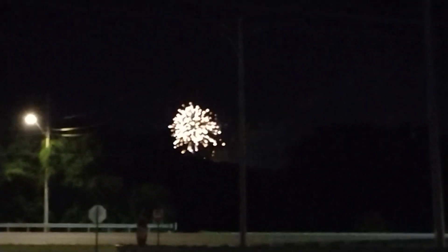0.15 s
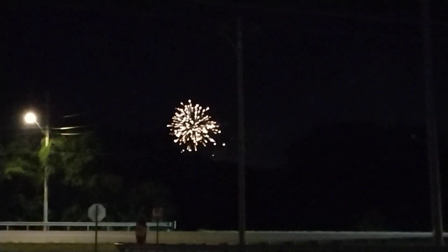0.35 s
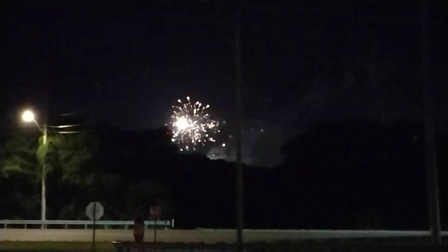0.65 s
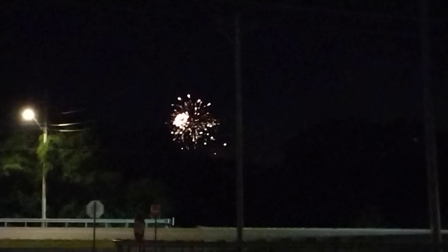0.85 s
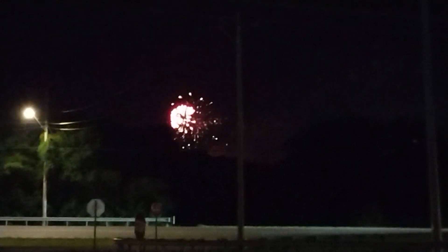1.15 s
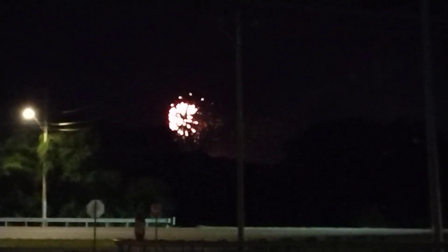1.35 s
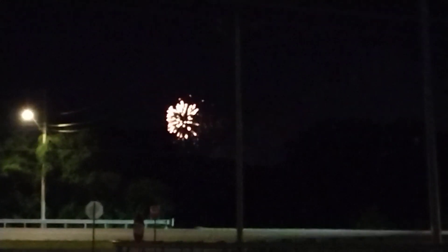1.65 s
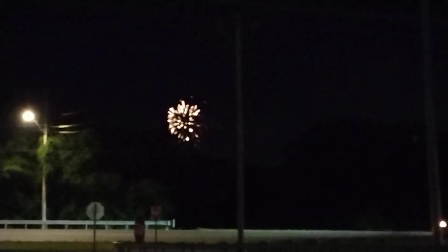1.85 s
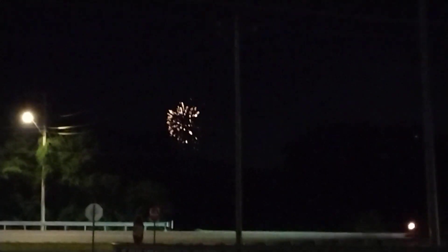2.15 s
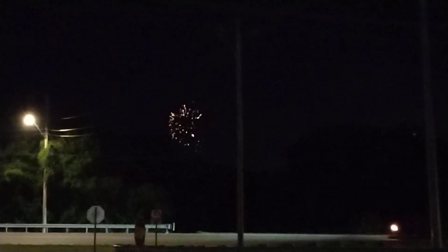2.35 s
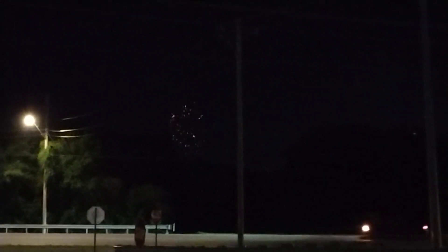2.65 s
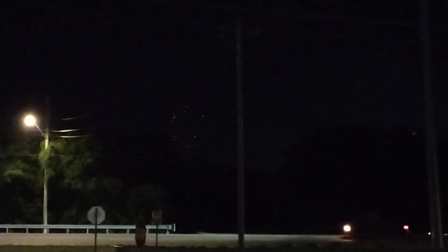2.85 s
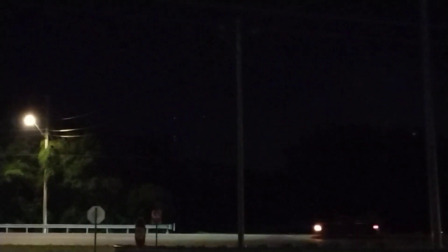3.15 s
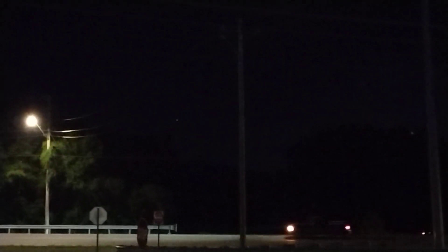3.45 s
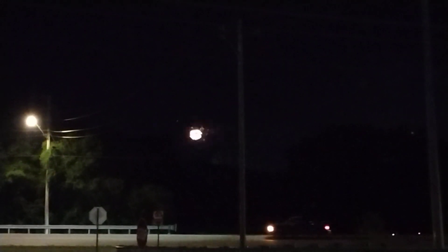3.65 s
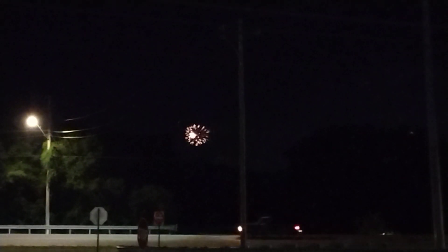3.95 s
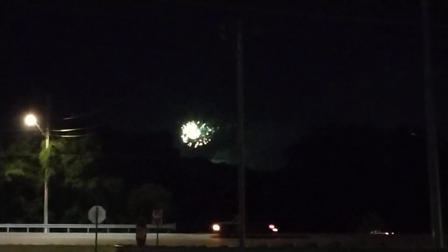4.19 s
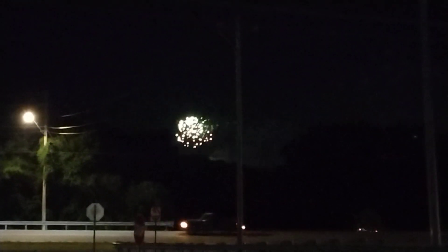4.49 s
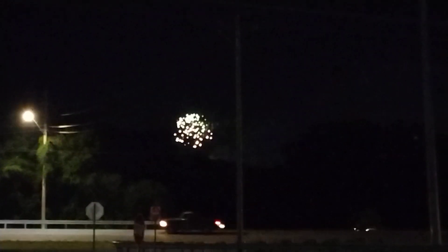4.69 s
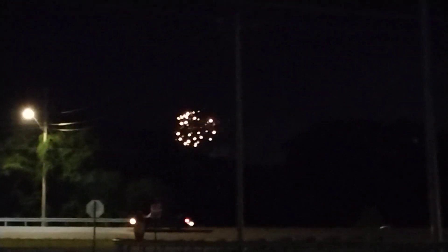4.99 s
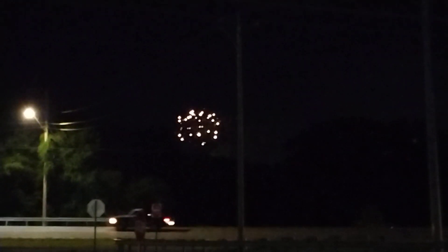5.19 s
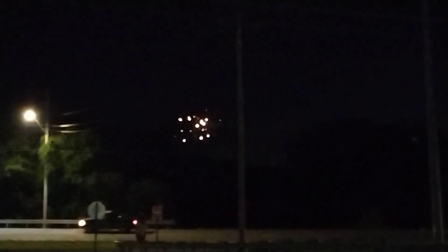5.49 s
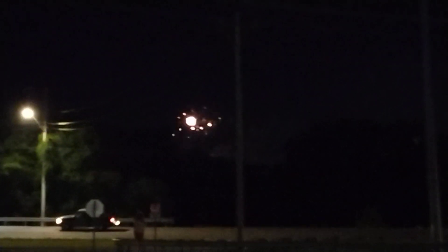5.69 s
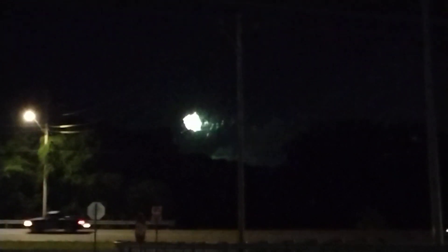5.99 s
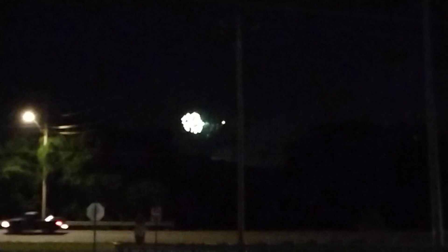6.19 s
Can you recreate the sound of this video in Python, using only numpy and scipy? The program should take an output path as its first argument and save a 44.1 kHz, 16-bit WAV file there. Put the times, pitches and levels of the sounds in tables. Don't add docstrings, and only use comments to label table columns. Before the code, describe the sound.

Outdoors at night by a road, a faint low engine drone around 90 hertz wavers beneath soft, dark traffic hiss. Far firework reports open at 0.2 s with two moderate thuds and knocking crackle, then a dry, sharper bang at 0.5 s with bright little snaps. Weak pops and dull thuds follow to about 1.2 s, and the rumble dies down. At 2.3 s a strong deep boom lands, with several wall echoes until 2.9 s. A clear, brighter bang cracks at 3.0 s, small crackles at 3.3 s, and a dull heavy boom at 3.4 s. A faint one at 4.2 s leads into the salvo: two close booms at 4.5 and 4.6 s, the loudest at 4.8 s, another at 5.1 s. Echoes roll away, leaving small pops from 5.6 s as a car's low rumble quietly nears by 6.3 s. The small microphone sounds thin in bass and muted on top.

```python
import sys
import numpy as np
from scipy import signal
from scipy.fft import rfft, irfft, next_fast_len
from scipy.io import wavfile

SR = 44100
rng = np.random.default_rng(int(sys.argv[2]) if len(sys.argv) > 2 else 0)


def gain_from_decibels(decibels):
    exponent = np.asarray(decibels, float) / 20
    return 10 ** exponent


def output_pcm(signal):
    pcm = np.clip(np.atleast_2d(signal).T, -1, 1) * 32767
    wavfile.write(sys.argv[1], SR, np.round(pcm).astype(np.int16))


N = 279277

# start_s [s], level_db [dB]
ROAD_LEVEL = [(0, -43), (.8, -43), (1.6, -44.5), (2.7, -44), (3.3, -43), (4.3, -44.5), (5.3, -45),
              (6.33, -43.5)]
# frequency_hz [Hz], density_db [dB per Hz]
ROAD_SPECTRUM = [(22, -54.5), (42, -32), (60, -19), (118, -7.5), (200, -25.5), (350, -25), (395, -34),
                 (600, -26), (1100, -28.5), (2200, -34), (3450, -45), (4600, -44), (6100, -60.5),
                 (7950, -60.5), (8300, -103.5)]
CAR_NEAREST_S, CAR_WIDTH_S, CAR_DB, CAR_HZ, CAR_BAND_HZ = 6.3, 0.5, -43, 125, 70

# start_s [s], level_db [dB]
DRONE_LEVEL = [(0.0, -40), (0.46, -45.5), (1.2, -43.5), (1.8, -38), (2.3, -42.5), (2.9, -40), (3.25, -41),
               (3.45, -41), (4.4, -40), (4.6, -41.5), (4.85, -47.5), (5.1, -39.5), (5.35, -42), (5.62, -63),
               (6.33, -37)]
DRONE_HZ, DRONE_WIDTH_HZ = 90, 6.8

# frequency_hz [Hz], density_db [dB per Hz]
DEEP_SPECTRUM = [(45, -26.5), (70, -11), (110, -1.5), (176, -1), (250, -5.5), (310, -12.5), (355, -27),
                 (420, -45.5)]
KNOCK_SPECTRUM = [(385, -13), (450, -2), (560, -0.5), (710, -0.5), (790, -7), (860, -13), (1800, -20.5),
                  (3000, -30), (5000, -48)]
ROLL_FLOOR = [-51.5, -69]
# rise_s [s], t60_s [s], late_gain_db [dB]
SHELL_ROLL_SHAPE = [(0.068, 1.57, 2), (0.016, 2.7, -9.5)]
# below_peak_db [dB], rise_s [s], t60_s [s]
BANG_ROLL_SHAPE = [(-26.5, 0.17, 2.4), (-39.5, 0.014, 5.2)]
# start_s [s], deep_db [dB], knocking_db [dB], late_db [dB]
SHELL_RETURN_LEVELS = [
    (-.2, -36.5, -55, -51.5),
    (0.2271, -32.5, -51.5, -54),
    (2.2917, -24.5, -41, -42.5),
    (3.421, -29.5, -41.5, -40.5),
    (4.224, -44, -46.5, -52.5),
    (4.5243, -25.5, -47.5, -39),
    (4.594, -23.5, -38, -48),
    (4.8422, -22.5, -38.5, -39.5),
    (5.0919, -24.5, -39, -43.5),
]
RETURN_S, RETURN_SPREAD_S = 0.535, 0.19
SHELL_ROLL_ENDS_DB_PER_S2, BANG_ROLL_ENDS_DB_PER_S2 = 40.5, 8.5

# start_s [s], peak_db [dB], ring_hz [Hz]
SNAP_EVENTS = [(0.523, -41.5, 3800), (0.5494, -44.5, 3700), (0.6563, -42.5, 3780), (0.747, -41.5, 4400),
               (2.4117, -61, 7600), (3.0098, -39, 3370), (3.145, -49, 3760), (3.284, -39.5, 3720),
               (3.284, -42, 4340), (3.2823, -60, 7700), (3.3077, -58, 7500), (5.5683, -53.5, 7080)]
# start_s [s], peak_db [dB], ring_hz [Hz]
TICK_EVENTS = [(0.5223, -26.5, 1600), (0.5222, -36, 2240), (0.5442, -33.5, 1900), (0.533, -35, 1500),
               (0.553, -43, 1300), (4.5225, -40.5, 1800), (4.594, -41, 1900), (0.6578, -39.5, 2260),
               (0.7968, -39.5, 1640), (0.9415, -44, 1520), (1.4214, -44, 2080), (1.477, -44, 1960),
               (1.527, -44.5, 1890), (1.5573, -40.5, 1620), (2.3769, -39.5, 1410), (3.0114, -40, 1440),
               (3.2838, -38, 2000), (3.5022, -40, 1700), (3.975, -38, 1500), (5.139, -40.5, 1480),
               (5.568, -38.5, 1940), (5.57, -39, 1000), (0.523, -37, 2900), (3.01, -37, 2650),
               (5.324, -39.5, 1000), (1.1, -37.5, 935), (4.303, -38, 760), (4.245, -39, 750)]
# start_s [s], peak_db [dB], ring_hz [Hz]
CRACKLE_EVENTS = [(0.175, -29, 553), (0.582, -36, 540), (0.792, -32.5, 590), (0.818, -35, 674),
                  (1.077, -31, 362), (0.3, -37, 400), (0.344, -35.5, 380), (0.232, -23, 400),
                  (0.26, -33.5, 360), (3.178, -39, 650), (5.931, -42, 408), (3.622, -34.5, 400),
                  (4.361, -36, 390), (0.939, -31.5, 700), (3.036, -33.5, 686), (3.146, -33.5, 626),
                  (3.256, -43, 611), (3.266, -34, 750), (3.281, -26.5, 620), (3.309, -33, 640),
                  (3.334, -36.5, 574), (3.383, -43, 630)]
CRACKLE_MS, TICK_MS, SNAP_MS = 8.3, 5.6, 6.8

# start_s [s], thud_db [dB], knock_db [dB], push_ms [ms]
FAR_POPS = [(0.306, -31.5, -49, 0.99), (0.645, -28.5, -32.5, 11.5), (1.079, -29.5, -47, 4.8),
            (1.1, -32, -33, 2.1), (1.1523, -22, -36, 2.7), (1.189, -27.5, -30, 3.2),
            (2.2561, -25, -32, 0.8), (5.5723, -21, -50, 2.05), (5.9335, -30, -32, 0.84),
            (6.068, -33, -39, 0.91), (6.205, -30.5, -37, 2.3), (6.281, -29, -38.5, 2.2)]
# start_s [s], thud_db [dB], knock_db [dB], push_ms [ms]
WALL_ECHOES = [(2.328, -19, -34, 4), (2.3758, -26.5, -28.5, 1.1), (2.3943, -22, -42, 1.3),
               (2.513, -28, -42, 0.78), (2.583, -21.5, -28.5, 2.47), (2.623, -38, -29.5, 1.9),
               (2.7727, -24, -37, 2.1), (2.823, -23, -32, 2.55), (2.863, -21.5, -26, 2.9),
               (3.4547, -24, -23, 1.4), (3.5005, -34, -35, 5.5), (3.619, -38, -37, 3.7),
               (3.6955, -27.5, -33, 0.45), (3.7608, -31, -36, 0.46), (3.84, -33, -28, 4.2),
               (3.881, -36, -29, 2.6), (3.968, -28, -39, 3.1), (4.2652, -27.5, -29, 2.8),
               (4.359, -31, -44, 0.79), (4.3973, -27, -41, 2.7), (4.555, -15.5, -34, 3.9),
               (4.6243, -13.5, -27, 3.5), (4.639, -24, -40, 0.93), (4.8953, -23, -33, 1.7),
               (5.0022, -24, -47, 2.34), (5.129, -24, -23, 1.16), (5.1376, -15.5, -44, 1.34),
               (5.1923, -26, -40, 2.7), (5.325, -17.5, -42, 1.5)]
THUD_DAMPING, THUD_CUT_HZ, THUD_BOUNCE = 0.27, 324, 0.58
KNOCK_HZ, KNOCK_SPREAD, KNOCK_MS, KNOCK_BOUNCE = 585, 0.1, 4.8, 0.32

# start_s [s], peak_db [dB], push_ms [ms], suction_damping [ratio], air_cut_hz [Hz]
LOW_BANGS = [
    (0.1751, -16.3, 0.9, 0.6, 400.0),
    (0.5228, -10.5, 0.97, 0.77, 650.0),
    (0.583, -19.7, 0.78, 0.25, 300.0),
    (0.9402, -23.0, 0.58, 0.25, 210.0),
    (3.0097, -10.4, 2.19, 2.0, 1060.0),
]
# start_s [s], peak_db [dB], push_ms [ms], suction_damping [ratio], air_cut_hz [Hz]
HIGH_SHELLS = [
    (0.2271, -14.2, 0.8, 0.73, 260.0),
    (2.2917, -7.4, 2.67, 1.3, 300.0),
    (3.421, -7.9, 1.32, 0.93, 210.0),
    (4.2249, -18.4, 2.81, 0.15, 510.0),
    (4.5243, -8.3, 3.15, 0.49, 640.0),
    (4.5919, -6.2, 2.51, 1.23, 340.0),
    (4.8422, -4.7, 1.41, 0.67, 270.0),
    (5.0919, -5.0, 1.37, 0.85, 320.0),
]
SHELL_BOUNCE, BANG_BOUNCE = 0.93, 0.38
FRONT_KNOCK_DB, FRONT_KNOCK_HZ, FRONT_KNOCK_MS = -19, 734, 20
FRONT_CRACK_DB, FRONT_CRACK_HZ, FRONT_CRACK_MS = -29.5, 1280, 11
CLEAR_DB_PER_OCTAVE, DULL_HZ = 6, 304

GROUND_LAG_MS, MIC_BASS_CUT_HZ = 1.36, 110
AIR_TOP_HZ = 4130


def rms_one(x):
    return x / np.sqrt(np.mean(x ** 2) + 1e-20)


def level_curve(rows):
    s, db = np.transpose(rows)
    return gain_from_decibels(np.interp(np.arange(N) / SR, s, db))


def add(track, s, sound):
    i = round(s * SR)
    track[i:i + len(sound)] += sound[:N - i]


def drift(rate_hz):
    r = np.exp(-80 * np.pi * rate_hz / SR)
    noise = rng.standard_normal(N // 40 + 2002)
    slow = signal.lfilter([1], [1, -2 * r, r * r], noise)[2000:]
    return np.interp(np.arange(N) / 40, np.arange(len(slow)), rms_one(slow))


def resonance(x, hz, width_hz):
    r = np.exp(-np.pi * width_hz / SR)
    gain = (1 - r * r) / 2
    return signal.lfilter([gain, 0, -gain], [1, -2 * r * np.cos(2 * np.pi * hz / SR), r * r], x)


def colour(source, spectrum, patchy_db):
    hz, db = np.transpose(spectrum)
    size = next_fast_len(N)
    octave = np.log2(np.maximum(np.arange(size // 2 + 1) * SR / size, 1))
    gain = gain_from_decibels(np.interp(octave, np.log2(hz), db, left=-200, right=-200))
    shaped = rfft(source, size) * gain
    out = 0
    for centre in np.arange(np.log2(hz[0]), np.log2(hz[-1]) + 1 / 3, 1 / 3):
        window = np.maximum(1 - 3 * np.abs(octave - centre), 0)
        band = irfft(shaped * window, size)[:N]
        out = out + band * gain_from_decibels(patchy_db * drift(9))
    return rms_one(out)


def road():
    return level_curve(ROAD_LEVEL) * colour(rng.standard_normal(N), ROAD_SPECTRUM, patchy_db=1.7)


def car():
    away = (np.arange(N) / SR - CAR_NEAREST_S) / CAR_WIDTH_S
    rumble = resonance(rng.standard_normal(N), CAR_HZ, CAR_BAND_HZ)
    rumble = resonance(rumble, CAR_HZ, 2 * CAR_BAND_HZ)
    return gain_from_decibels(CAR_DB) * rms_one(rumble) / np.sqrt(1 + away ** 2)


def drone():
    pitch_hz = DRONE_HZ + 1.4 * drift(2.87)
    note = np.sin(2 * np.pi * np.cumsum(pitch_hz) / SR) * gain_from_decibels(1.9 * drift(19))
    rough = resonance(rng.standard_normal(N + SR), DRONE_HZ, DRONE_WIDTH_HZ)[SR:]
    return level_curve(DRONE_LEVEL) * rms_one(note + 0.21 * rms_one(rough))


def dying(s, db, rise_s, t60_s, ends_db_per_s2):
    age = np.maximum(np.arange(N) / SR - s, 0)
    decay = gain_from_decibels(db - 60 * age / t60_s - ends_db_per_s2 * age ** 2)
    return (decay * (1 - np.exp(-age / rise_s))) ** 2


def roll_level(band):
    t = np.arange(N) / SR
    power = gain_from_decibels(2 * ROLL_FLOOR[band])
    rise_s, t60_s, late_gain_db = SHELL_ROLL_SHAPE[band]
    for s, *near_db, late_db in SHELL_RETURN_LEVELS:
        swell = np.exp(-((t - s - RETURN_S) / RETURN_SPREAD_S) ** 2)
        late = gain_from_decibels(late_db + late_gain_db) * swell
        power = power + dying(s, near_db[band], rise_s, t60_s, SHELL_ROLL_ENDS_DB_PER_S2) + late ** 2
    below_db, rise_s, t60_s = BANG_ROLL_SHAPE[band]
    for s, db, *_ in LOW_BANGS:
        power = power + dying(s, db + below_db, rise_s, t60_s, BANG_ROLL_ENDS_DB_PER_S2)
    return np.sqrt(power)


def roll(per_s, spread_db):
    sizes = gain_from_decibels(spread_db * np.minimum(rng.exponential(1, N), 4)) * rng.choice([-1, 1], N)
    echoes = sizes * (rng.random(N) < per_s / SR)
    deep = roll_level(0) * colour(echoes, DEEP_SPECTRUM, patchy_db=0.63)
    knocking = roll_level(1) * colour(echoes, KNOCK_SPECTRUM, patchy_db=1.3)
    return deep + knocking


def ticks(rows, lead_ms, sharpness, boost_db):
    out, t = np.zeros(N), np.arange(round(0.04 * SR)) / SR
    for s, db, hz, spray_ms in rows:
        spray = 1.7 * (t == 0) + 0.25 * rng.standard_normal(len(t))
        spray = spray * np.exp(-2000 * t / spray_ms)
        ring = resonance(spray, hz, hz / sharpness)
        ring = resonance(ring, hz, hz / 2.7)
        add(out, s + lead_ms / 1000, gain_from_decibels(db + boost_db) * ring / np.abs(ring).max())
    return out


def snaps():
    return ticks([(*row, SNAP_MS) for row in SNAP_EVENTS], lead_ms=0.47, sharpness=13.0, boost_db=-0.8)


def fronts(below_db, hz, spray_ms):
    rows = []
    for s, db, _, _, cut_hz in HIGH_SHELLS:
        clear_db = CLEAR_DB_PER_OCTAVE * np.log2(cut_hz / DULL_HZ)
        rows.append((s, db + below_db + clear_db, hz, spray_ms))
    return rows


def cracks():
    knocks = fronts(FRONT_KNOCK_DB, FRONT_KNOCK_HZ, FRONT_KNOCK_MS)
    for s, _, db, _ in WALL_ECHOES + FAR_POPS:
        knocks.append((s, db, KNOCK_HZ * np.exp(KNOCK_SPREAD * rng.standard_normal()), KNOCK_MS))
    far = ticks(knocks, lead_ms=1.2, sharpness=2.3, boost_db=-3)
    lag = round(GROUND_LAG_MS * SR / 1000)
    far = far + KNOCK_BOUNCE * np.r_[np.zeros(lag), far[:-lag]]
    charges = [(*row, CRACKLE_MS) for row in CRACKLE_EVENTS]
    crackle = ticks(charges, lead_ms=1.5, sharpness=0.91, boost_db=2)
    dry_rows = fronts(FRONT_CRACK_DB, FRONT_CRACK_HZ, FRONT_CRACK_MS)
    dry_rows += [(*row, TICK_MS) for row in TICK_EVENTS]
    return far + crackle + ticks(dry_rows, lead_ms=0.73, sharpness=1.4, boost_db=4.0)


def blast(push_ms, damping, cut_hz, bounce):
    u = np.arange(round(0.06 * SR)) / SR * 1000 / push_ms
    wave = (1 - u) * np.exp(-damping * u) * np.clip((2.4 - u) / 0.6, 0, 1)
    lag = round(GROUND_LAG_MS * SR / 1000)
    wave[lag:] += bounce * wave[:-lag].copy()
    wave = signal.sosfilt(signal.butter(2, cut_hz, fs=SR, output="sos"), wave)
    wave = signal.sosfilt(signal.butter(2, MIC_BASS_CUT_HZ, "high", fs=SR, output="sos"), wave)
    return wave / np.abs(wave).max()


def shells():
    out, t = np.zeros(N), np.arange(round(0.08 * SR)) / SR
    bursts = [(*row, SHELL_BOUNCE) for row in HIGH_SHELLS]
    bursts += [(*row, BANG_BOUNCE) for row in LOW_BANGS]
    for s, db, _, push_ms in WALL_ECHOES + FAR_POPS:
        bursts.append((s, db, push_ms, THUD_DAMPING, THUD_CUT_HZ, THUD_BOUNCE))
    for s, db, *shape in bursts:
        wave = blast(*shape)
        scatter = rng.standard_normal(len(t)) * np.exp(-t / 0.021) * np.clip(t / 0.0044 - 1, 0, 1)
        add(out, s, gain_from_decibels(db) * wave)
        add(out, s, gain_from_decibels(db - 33.5) * np.convolve(wave, scatter))
    return out


def scene():
    air = signal.butter(4, AIR_TOP_HZ, fs=SR, output="sos")
    far = signal.sosfilt(air, shells() + cracks())
    near = snaps() + road() + car()
    return (far + near + drone() + roll(per_s=1600, spread_db=2.5))[None]


def low_pass(x):
    return signal.sosfilt(signal.butter(12, 8250, fs=SR, output="sos"), x)


def record(dry):
    cut = signal.sosfilt(signal.butter(2, 42, "high", fs=SR, output="sos"), dry)
    cut = signal.sosfilt(signal.cheby2(10, 60, 8950, fs=SR, output="sos"), cut)
    return low_pass(cut)


dry = scene()
out = record(dry)
output_pcm(out)
```